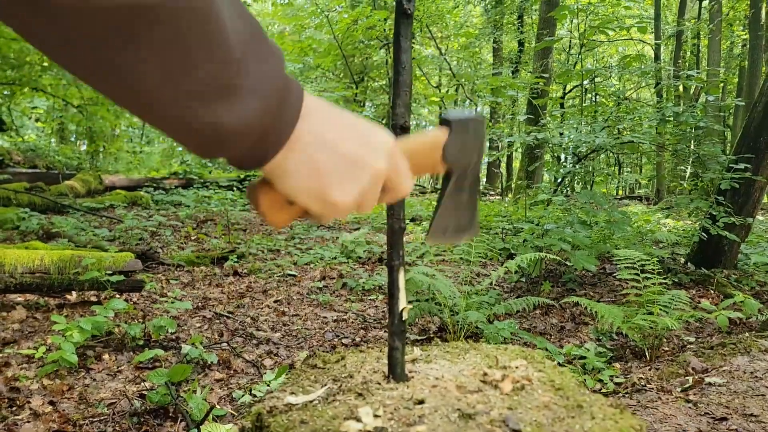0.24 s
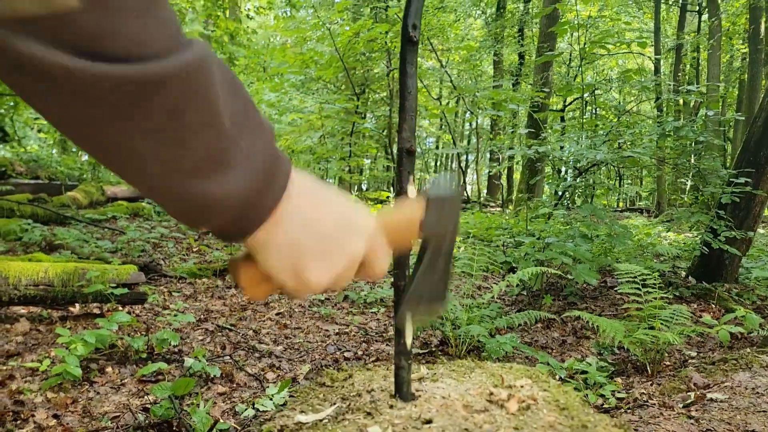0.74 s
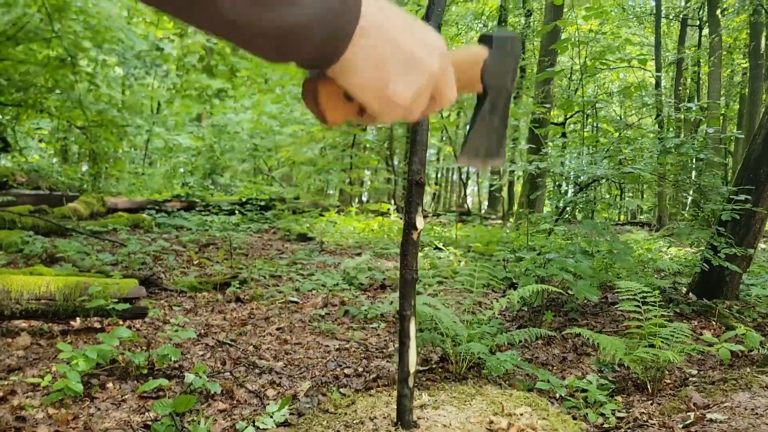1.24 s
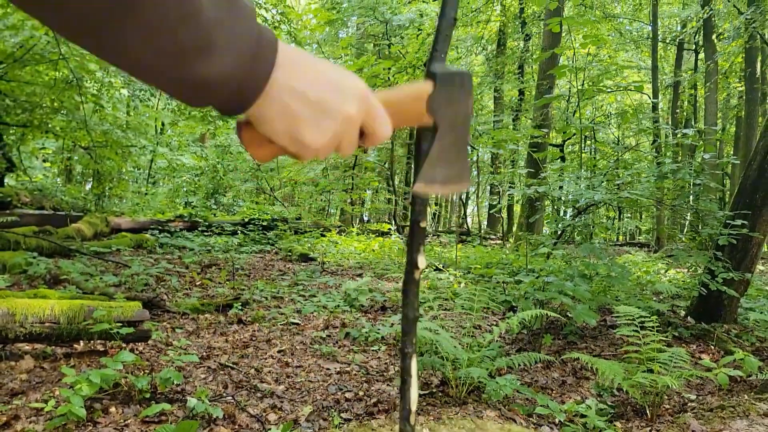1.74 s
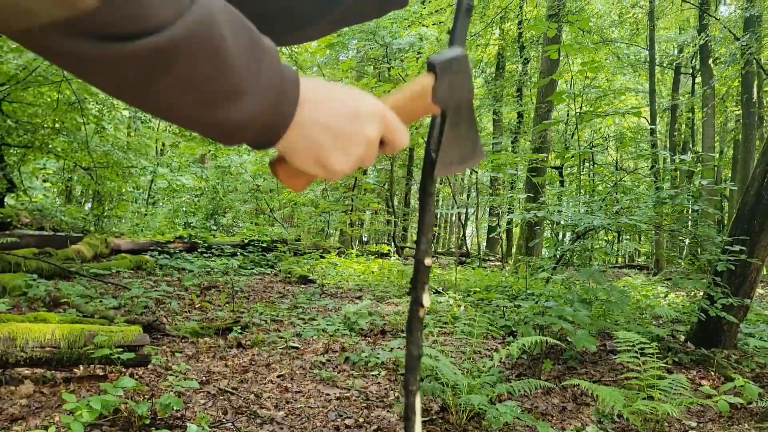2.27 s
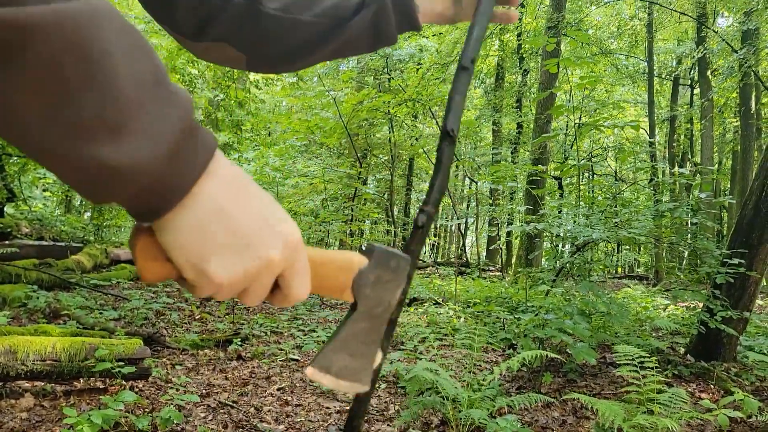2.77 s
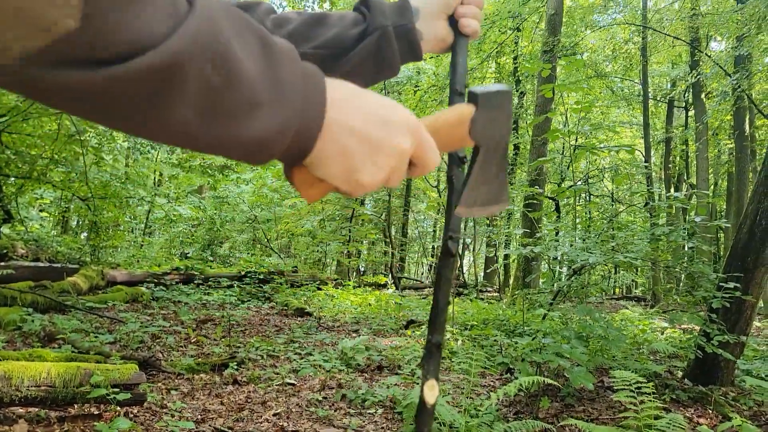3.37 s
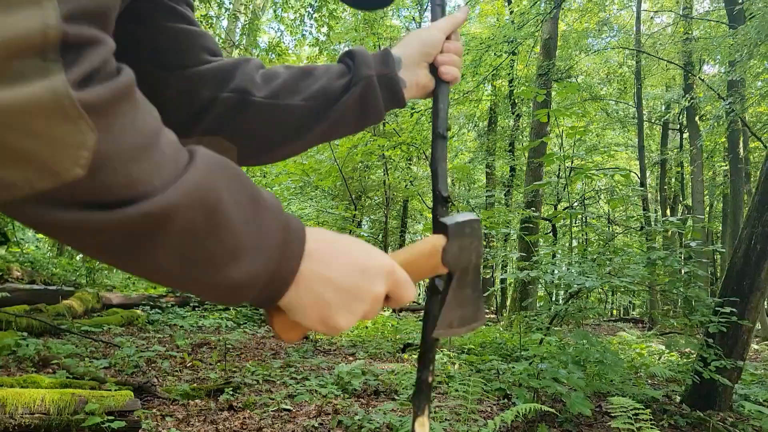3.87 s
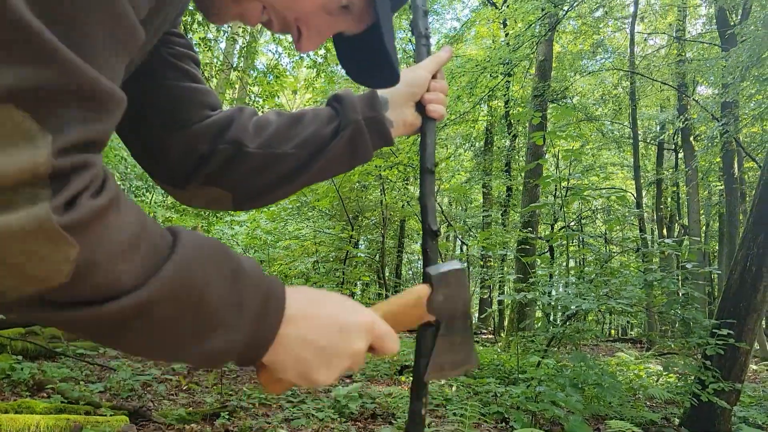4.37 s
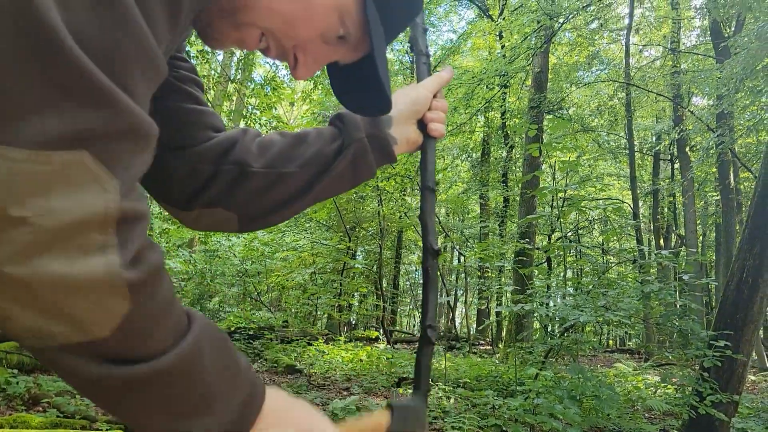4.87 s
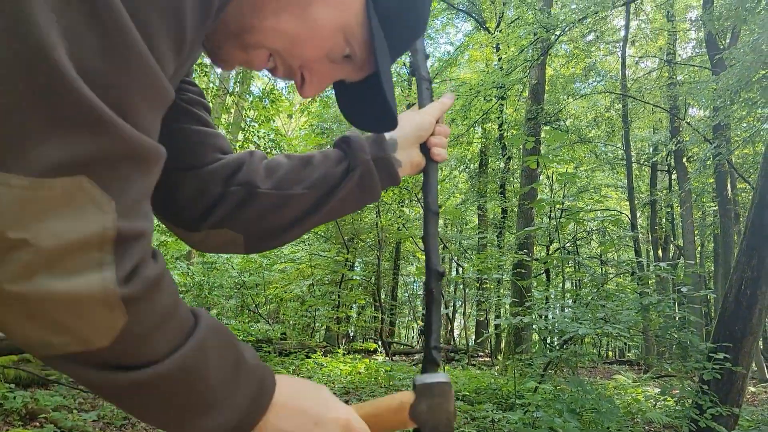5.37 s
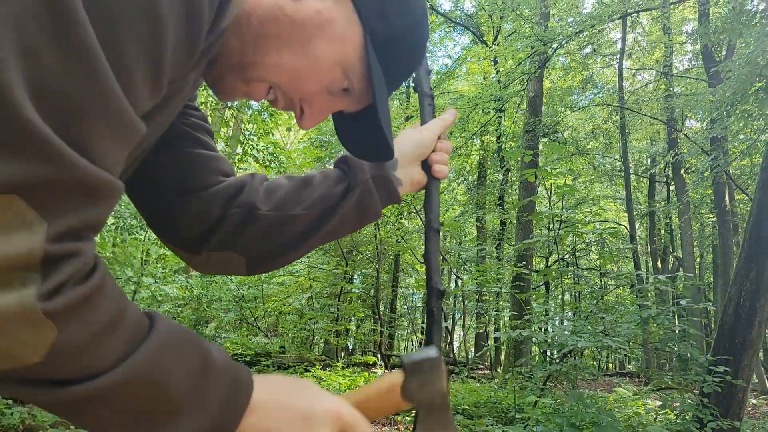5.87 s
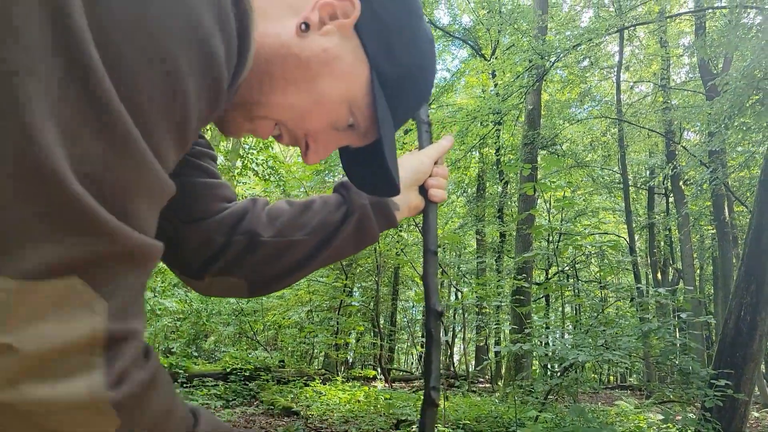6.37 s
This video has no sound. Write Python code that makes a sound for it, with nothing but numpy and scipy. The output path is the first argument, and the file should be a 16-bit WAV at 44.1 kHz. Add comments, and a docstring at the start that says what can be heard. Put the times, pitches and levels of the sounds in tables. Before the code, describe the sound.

A small hatchet chops branches off a dry stick in quick, sharp, crunchy knocks, with a soft forest echo and faint birds.

```python
"""In a forest, close to the microphone, a small hatchet trims a dry stick held upright on a stump.
Each chop at a side branch is a sharp bite, a crunch of tearing fibres and a few rebounds, all
sounding through the wood. The steel head rings faintly, and the stick's foot bumps the stump.
The trees send back a late, soft echo. Farther off are faint birds, a soft low note, the hiss of
leaves and a low rumble."""
import sys
import numpy as np
from scipy import signal
from scipy.fft import rfft, irfft, next_fast_len
from scipy.io import wavfile
from scipy.ndimage import uniform_filter1d, map_coordinates

SR = 44100
rng = np.random.default_rng(int(sys.argv[2]) if len(sys.argv) > 2 else 0)


def transcribe(u):
    """Save the signal u as a 16-bit wav file named by the first command-line argument.

    u: samples, shape (n,) or (channels, n), limited to [-1, 1]; the rate is SR.
    q: integer samples, one column per channel.
    """
    v = np.clip(np.atleast_2d(u).T, -1, 1)
    q = np.round(v * 32767).astype(np.int16)
    wavfile.write(sys.argv[1], SR, q)


N = 291760

# The blade meets the wood, close by, in bites and rebounds. Each row: start in seconds, level in dB,
# crunch t60 in seconds, steel ring in dB relative to the contact.
CONTACTS = [(0.0881, -5, 0.038, -41), (0.2955, -25.5, 0.011, -45), (0.4425, -1, 0.034, -47),
            (0.4612, -29, 0.051, -28), (0.4756, -32.5, 0.034, -25), (0.7868, -6.5, 0.041, -37),
            (0.7949, -20.5, 0.016, -44), (0.801, -24, 0.059, -38), (0.8116, -20, 0.021, -38),
            (1.5585, -8, 0.033, -30), (1.5644, -15.5, 0.042, -13.5), (1.5763, -8.5, 0.033, -39),
            (1.936, -12.5, 0.066, -31), (1.947, -9, 0.038, -16), (1.9765, -26.5, 0.04, -12),
            (1.9978, -23, 0.044, -17), (2.158, -53.5, 0.033, -39), (2.3473, -8.5, 0.069, -26.5),
            (2.3564, -18.5, 0.11, -10), (2.3655, -14, 0.017, -35), (2.3758, -29, 0.09, -20),
            (2.3952, -15, 0.033, -36), (3.5707, -13, 0.081, -22.5), (3.5876, -12, 0.047, -26),
            (3.6034, -33.5, 0.043, -23), (3.9968, -10.5, 0.051, -27), (4.0025, -23, 0.012, -13.5),
            (4.033, -19, 0.028, -43), (4.0463, -31.5, 0.098, -29), (4.0811, -33.5, 0.02, -33),
            (4.4687, -10, 0.037, -46), (4.4845, -20.5, 0.084, -36), (4.5082, -31, 0.048, -29),
            (4.52, -24, 0.017, -30.5), (4.87, -8.5, 0.041, -28), (4.875, -16.5, 0.043, -29),
            (4.888, -17.5, 0.059, -39), (4.8947, -22, 0.077, -35), (4.9155, -33.5, 0.13, -26),
            (4.9373, -23.5, 0.048, -12.5), (5.253, -6.5, 0.031, -41), (5.259, -19.5, 0.049, -26),
            (5.6382, -5, 0.0086, -47), (5.6436, -14, 0.039, -36), (5.658, -24.5, 0.075, -38),
            (5.6732, -26, 0.059, -45), (5.686, -36.5, 0.022, -7), (6.013, -3.5, 0.012, -51),
            (6.0183, -12, 0.026, -24), (6.029, -22.5, 0.053, -16), (6.0478, -28, 0.051, -24),
            (6.061, -30, 0.037, -41), (6.4312, -12, 0.092, -13), (6.4515, -15.5, 0.058, -40),
            (6.4677, -19.5, 0.013, -11), (6.482, -33.5, 0.078, -22)]
# The colour of each stroke. Each row: time in seconds, favoured wood pitch in Hz, its prominence in dB,
# body, knock and splinter levels in dB at a full blow, edge ring over head ring in dB.
STROKES = [(0.088, 2890, 2.5, -7, -8, -19.5, -8), (0.295, 3900, 19.5, -42, -30, -12, -15),
           (0.442, 2920, 3.5, -12.5, -13.5, -17.5, -8), (0.787, 2160, 2.5, -8, -10, -14.5, -6),
           (1.558, 1720, 1, -6.5, -9, -6.5, 2), (1.934, 1950, 3, -6, -9.5, -12, 1.5),
           (2.158, 4150, 0, 3.5, -12, -32, -6), (2.346, 1800, 2.5, -8, -11.5, -13.5, 7),
           (3.569, 4220, 2, -8.5, -15, -12, 4), (3.995, 2610, 9.5, -5.5, -15, -15.5, 0),
           (4.468, 2300, 8, -4, -11, -13.5, 12), (4.869, 2240, 6, -7.5, -15.5, -16, -4),
           (5.252, 2050, 1.5, -7.5, -12, -16.5, -3), (5.638, 2500, 8, -6, -16.5, -20.5, 0.5),
           (6.012, 2530, 10, -11, -21.5, -20.5, -7), (6.431, 2420, 5.5, -7, -16.5, -10.5, -9)]
# The dry stick's resonances. Each row: frequency in Hz, width in Hz, level in dB.
STICK_MODES = [(188, 103, 2), (368, 83, 3.5), (566, 110, 1), (697, 369, -1.5), (916, 640, -4),
               (1395, 69, -2.5), (1868, 217, 3.5), (2366, 199, 2.5), (3026, 430, 6), (4015, 1200, 2.5),
               (4530, 306, 8), (5465, 137, 21), (6020, 2200, 10), (7550, 1250, 13), (9500, 5100, -18),
               (13900, 13400, 3)]
# The steel head and its thin cutting edge. Each row: frequency in Hz, level in dB, t60 in seconds.
HEAD_MODES = [(2950, 0, .19), (2990, -8, .15), (4255, -24, .25), (5590, -24, .1)]
EDGE_MODES = [(9715, 0, .05), (7650, -16, .03)]


def chops():
    """The edge bites, then fibres snap at random in a dying crunch; stick and steel ring in answer."""
    track, t = np.zeros((2, N + SR)), np.arange(SR // 5) / SR
    low, body, mid, high = [[mode for mode in STICK_MODES if above_hz < mode[0] <= top_hz]
                            for above_hz, top_hz in [(0, 600), (600, 1600), (1600, 5000), (5000, SR)]]
    full_blow_db, bundle_db, bundle_s = -8, 4.5, 0.00153
    for start, db, t60, ring_db in CONTACTS:
        stroke = min(STROKES, key=lambda row: abs(row[0] - start))
        _, spot_hz, favour_db, body_db, knock_db, splinter_db, edge_db = stroke
        weak_db = full_blow_db - db
        dying = amp(-60 * t / np.clip(t60, .004, .2)) * (1 - np.exp(-t / 0.0017))
        # fibres part in bundles, so the crunch is lumpy
        lumps_db = bundle_db * np.interp(t / bundle_s, np.arange(400), rng.standard_normal(400))
        snaps = rng.standard_normal((3, len(t))) * amp(3.17 * rng.standard_normal(len(t)) + lumps_db)
        snaps *= dying
        # only hard contacts start with a clean bite
        bite = -np.exp(-((t - .0006) / .00008) ** 2) * np.clip((db + 24) / 16, 0, 1)
        force = 0.43 * snaps[0] + bite
        # fibres part all round the stick, so each channel gets some snaps of its own
        crack = force + 0.23 * snaps[1:]
        splinters = snaps[0] + 2.6 * snaps[1:] + 0.78 * bite
        spot_hz *= np.exp(0.013 * rng.normal())
        dull_db_per_octave = 1.14 * favour_db + 0.17 * max(weak_db, 0)  # weak contacts are duller
        sound = wood(crack, mid, spot_hz, favour_db, dull_db_per_octave) + 0.43 * bite
        sound += amp(body_db + 0.31 * weak_db) * wood(crack, body)
        sound += amp(knock_db + 0.47 * weak_db) * wood(force, low)
        sound += amp(splinter_db + 0.096 * weak_db) * wood(splinters, high)
        sound += amp(ring_db) * (steel(HEAD_MODES, t) + amp(edge_db) * steel(EDGE_MODES, t))
        add(track, start, amp(db) * at_microphone(sound, start))
    return track[:, :N]


def wood(force, modes, spot_hz=1, favour_db=0, dull_db_per_octave=0):
    """A force rings the stick; the struck spot favours modes near spot_hz and dulls those above."""
    scatter_db = rng.normal(0, 1.5, len(modes))
    top_hz = modes[-1][0]

    def response(f):
        ring = 0
        for k, (hz, width, db) in enumerate(modes):
            db += scatter_db[k] + favour_db * np.exp(-(np.log(hz / spot_hz) / 0.15) ** 2)
            db -= dull_db_per_octave * max(np.log2(hz / spot_hz), 0)
            ring += (-1) ** k * amp(db) * 1j * f * width / (hz * hz - f * f + 1j * f * width)
        # little comes through above the highest mode
        return ring / (1 - (f / top_hz / 1.2) ** 2 + 1j * f / top_hz) ** 2
    return unit_peak(filtered(force, response))


def steel(modes, t):
    """Struck steel rings in dying sines, at new strengths for every contact."""
    ring = sum(amp(db + rng.normal() - 60 * t / t60) * np.sin(2 * np.pi * hz * t)
               for hz, db, t60 in modes)
    return (1 - np.exp(-t / 0.00065)) * ring


# The chops stay in one place, reaching the left channel slightly earlier.
# Each row: time in seconds, lead of the left channel in milliseconds.
LEFT_LEAD = [(0, .13), (2.4, .14), (4, .14), (6.6, .13)]
# The microphone's housing shades the sound. Each row: frequency in Hz, left minus right in dB.
HOUSING_SHADE = [(150, -2), (700, -3.4), (2500, -3), (5000, -.7), (9000, 2), (14000, 1.5)]


def at_microphone(sound, start):
    """A blow reaches the left side earlier and, except in the treble, weaker than the right."""
    lead_s = np.interp(start, *np.transpose(LEFT_LEAD)) / 1000
    side = np.array([[.5], [-.5]])

    def response(hz):
        lead_turns = hz * lead_s / np.hypot(1, hz / 2460)  # the lead time shrinks in the treble
        return amp(side * at_pitch(HOUSING_SHADE, hz)) * np.exp(2j * np.pi * (side - .5) * lead_turns)
    return filtered(sound, response)


# Down at the stump, slightly to the right. Each row: start in seconds, level in dB, pitch in Hz.
STUMP_BUMPS = [(0.1, -24, 71), (0.457, -29, 70), (0.811, -24.5, 100.6), (1.775, -36, 97), (1.958, -27, 72),
               (2.772, -41, 68), (3.161, -35, 79.6), (3.499, -38, 99), (4.443, -34, 92), (4.476, -24.5, 73),
               (5.896, -42, 67.6), (6.335, -43.5, 92)]


def stump_bumps():
    """The stick's foot bumps the stump: a low dying swing with a puff of dull noise."""
    track, t = np.zeros((2, N + SR)), np.arange(SR // 4) / SR
    for start, db, hz in STUMP_BUMPS:
        swing = np.sin(2 * np.pi * hz * t) * amp(-60 * t / 0.16) * (1 - np.exp(-t / 0.00034))
        burst = rng.standard_normal(len(t)) * amp(-60 * t / 0.13)
        puff = filtered(burst, lambda f: 1 / (1 + 1j * f / 350) ** 2)
        bump = unit_peak(swing) + 0.55 * unit_peak(puff)
        add(track, start, amp(db) * bump * amp([[-1.1], [1.1]]))
    return track[:, :N]


# Trunks some way from the microphone. Each row: frequency in Hz, relative echo in dB, t60 in seconds.
TREE_ECHO = [(300, -35, .5), (990, -4.5, 1.23), (3120, 2, 1.36), (7500, 13, 0.57), (9400, 5, 0.5),
             (16000, -21, .3)]


def tree_echo(blows, build_s=0.047):
    """The answer of the trunks builds up, then each frequency dies at its own speed."""
    track, step = np.zeros((2, N + 2 * SR)), SR // 4
    for first in range(0, N, step):  # a fresh tail every quarter second
        hz, t, noise = signal.stft(rng.standard_normal((2, SR)), SR, nperseg=256)
        db, t60 = at_pitch(TREE_ECHO, hz[:, None]), at_pitch(TREE_ECHO, hz[:, None], column=2)
        envelope = amp(db - 60 * t / t60) * (1 - np.exp(-(t / build_s) ** 2))
        tail = signal.istft(noise * envelope, SR, nperseg=256)[1] / np.sqrt(SR)
        add(track, first / SR, signal.fftconvolve(blows[:, first:first + step], tail, axes=1))
    return track[:, :N]


# Birds far from the microphone. Each row: start and length in seconds, first and last pitch in Hz,
# level in dB.
BIRD_WHISTLES = [(.65, 0.11, 12900, 12450, -75), (3.4, .13, 4410, 4400, -65), (4.66, .17, 4400, 4390, -68),
                 (4.79, .09, 2680, 2700, -67), (5.02, .18, 3520, 3480, -65), (5.195, 0.21, 4370, 4350, -63),
                 (5.508, 0.2, 4200, 4120, -74), (5.93, .08, 4280, 4180, -65), (6.3, 0.12, 4250, 4230, -67)]


def birds():
    """Thin gliding whistles swell and fade, unsteady from their way through the trees."""
    track = np.zeros((2, N + SR))
    waver_hz = 25 * wobble(120)
    for start, length, first_hz, last_hz, db in BIRD_WHISTLES:
        progress = np.linspace(0, 1, round(length * SR))
        glide_hz = first_hz + (last_hz - first_hz) * np.sqrt(progress)
        turns = np.cumsum(glide_hz + waver_hz[round(start * SR):][:len(progress)]) / SR
        swell = np.sqrt(np.sin(np.pi * progress).clip(0))
        add(track, start, amp(db) * swell * np.sin(2 * np.pi * (turns + rng.random((2, 1)) / 6)))
    return track[:, :N] * amp(5 * np.array([wobble(40), wobble(40)]))


# A soft low note, far off. Each row: start in seconds, length in seconds, level in dB.
HOOTS = [(3.77, 0.41, -60.5), (6.456, 0.18, -55)]


def far_hoot(pitch_hz=501, width_hz=47):
    """Narrow noise around one pitch swells and fades."""
    note = filtered(rng.standard_normal((2, N)), lambda hz: np.exp(-((hz - pitch_hz) / width_hz) ** 2))
    t = np.arange(N) / SR
    swell = sum(amp(db) * np.sin(np.pi * np.clip((t - start) / length, 0, 1))
                for start, length, db in HOOTS)
    return swell * unit_rms(note[0] + 0.33 * note)


# The forest all around. Each row: time in seconds, then rumble, leaves and thin high hiss in dB.
FOREST_LEVELS = [(0.0, -47.5, -56, -66.5), (1.56, -45, -56.5, -70), (2.03, -48, -57.5, -71.5),
                 (3.3, -47.5, -56, -74), (5.64, -46.5, -60, -77.5), (6.41, -54, -55.5, -77),
                 (6.62, -35.5, -45.5, -66)]
# The colours of those three layers. Each row: frequency in Hz, relative spectral density in dB.
RUMBLE_SPECTRUM = [(20, -21), (38, 0.5), (64, 5), (150, -8), (184, -17), (214, -26), (400, -26), (520, -53),
                   (880, -120)]
LEAF_SPECTRUM = [(120, -80), (200, -3.5), (360, -18), (509, -9.5), (623, -14), (1120, -13.5), (1480, -15.5),
                 (2420, -14.5), (3760, -15), (4270, -13.5), (4680, -21.5), (5630, -17), (8270, -35.5),
                 (11000, -68.5)]
HISS_SPECTRUM = [(7000, -120), (8500, -1.5), (11000, -8), (12500, 1.5), (16500, -5)]


def forest_air():
    """Far rumble swells in lumps under the hiss of leaves and a thin high hiss."""
    times, *levels = np.transpose(FOREST_LEVELS)
    rumble_db, leaves_db, hiss_db = [np.interp(np.arange(N) / SR, times, db) for db in levels]
    rumble = unit_rms(amp(2.8 * wobble(25)) * diffuse_noise(RUMBLE_SPECTRUM, patchy_db=1.37))
    leaves = amp(leaves_db + [[-.4], [.4]]) * diffuse_noise(LEAF_SPECTRUM, patchy_db=1.03)
    hiss = amp(hiss_db) * diffuse_noise(HISS_SPECTRUM, patchy_db=1.0)
    return amp(rumble_db + [[-.8], [.8]]) * rumble + leaves + hiss


# The background at the microphone's two sides. Each row: frequency in Hz, left-right correlation.
STEREO_LIKENESS = [(60, 1), (180, 0.88), (550, 0.32), (1650, -0.19), (4970, 0.086), (15000, -0.011)]


def diffuse_noise(spectrum, patchy_db):
    """Stereo noise of rms 1, its level uneven in random patches of pitch and time."""
    cells = signal.stft(rng.standard_normal((2, N + 512)), nperseg=512)[2]
    patches = uniform_filter1d(uniform_filter1d(rng.standard_normal(cells.shape[1:]), 6, 0), 14, 1)
    noise = signal.istft(cells * amp(patchy_db * unit_rms(patches)), nperseg=512)[1][:, :N]

    def response(hz):
        spread = np.arccos(np.clip(at_pitch(STEREO_LIKENESS, hz), -1, 1)) / 2
        return amp(at_pitch(spectrum, hz)) * [np.cos(spread), np.sin(spread)]
    mid, side = filtered(noise, response)
    return unit_rms(np.array([mid + side, mid - side]))


def amp(db):
    return 10 ** (np.asarray(db) / 20)


def unit_rms(x):
    return x / np.sqrt(np.mean(x ** 2) + 1e-20)


def unit_peak(x):
    return x / (np.max(np.abs(x)) + 1e-20)


def at_pitch(table, hz, column=1):
    """One column of a table, interpolated on a log frequency axis."""
    columns = np.transpose(table)
    return np.interp(np.log(hz + 1), np.log(columns[0] + 1), columns[column])


def wobble(rate):
    """A smooth random curve, rate knots a second."""
    return map_coordinates(rng.standard_normal(int(N * rate / SR) + 4), [np.arange(N) * rate / SR])


def filtered(x, response):
    """x through a complex response of frequency in Hz."""
    size = next_fast_len(x.shape[-1] + 4096)
    return irfft(rfft(x, size) * response(np.fft.rfftfreq(size, 1 / SR)), size)[..., :x.shape[-1]]


def add(track, start, sound):
    """Mixes a stereo sound in at start seconds."""
    track[:, round(start * SR):][:, :sound.shape[1]] += sound


def scene():
    """Hatchet and stump up close, the echo behind them, the forest beyond."""
    blows = chops()
    echo = amp([[-14.5], [-13]]) * tree_echo(blows)
    return blows + echo + stump_bumps() + forest_air() + far_hoot() + birds()


def record(dry, low_cut_hz=30, gain_db=3, top_hz=16100):
    """The microphone drops the lowest bass, clips at full scale and keeps nothing above top_hz."""
    heard = filtered(dry, lambda hz: (1j * hz / (low_cut_hz + 1j * hz)) ** 2)
    return filtered(np.clip(amp(gain_db) * heard, -1, 1), lambda hz: hz < top_hz)


dry = scene()
out = record(dry)
transcribe(out)
```